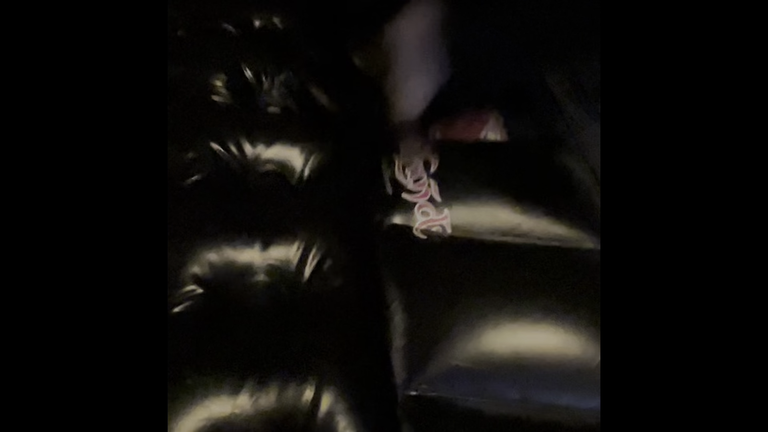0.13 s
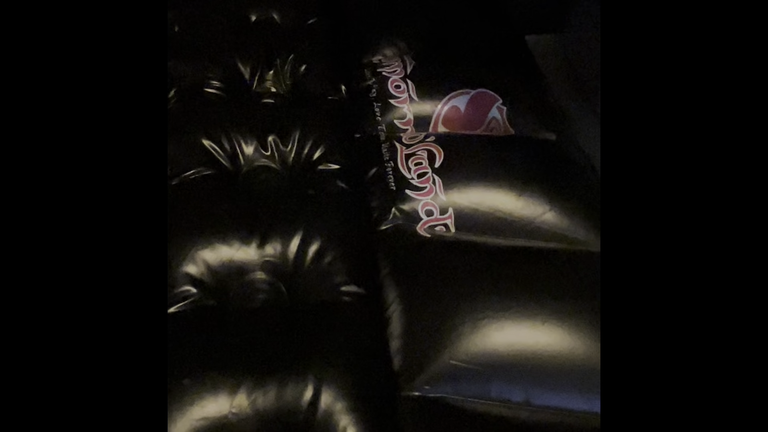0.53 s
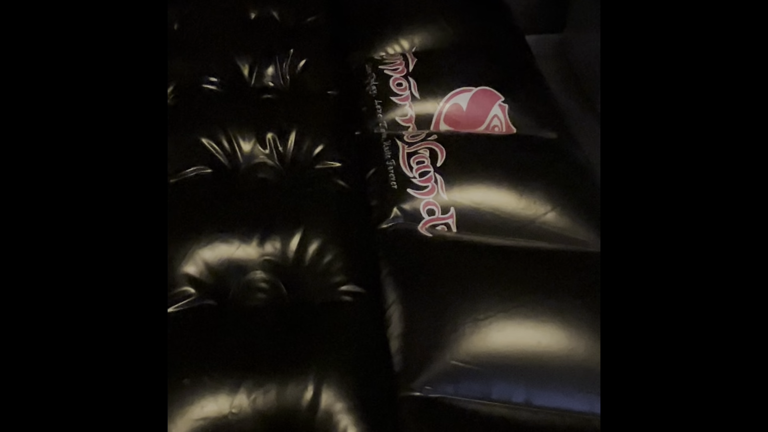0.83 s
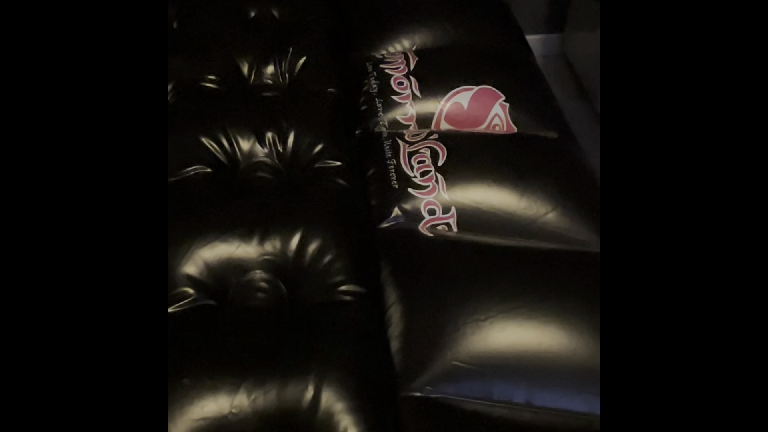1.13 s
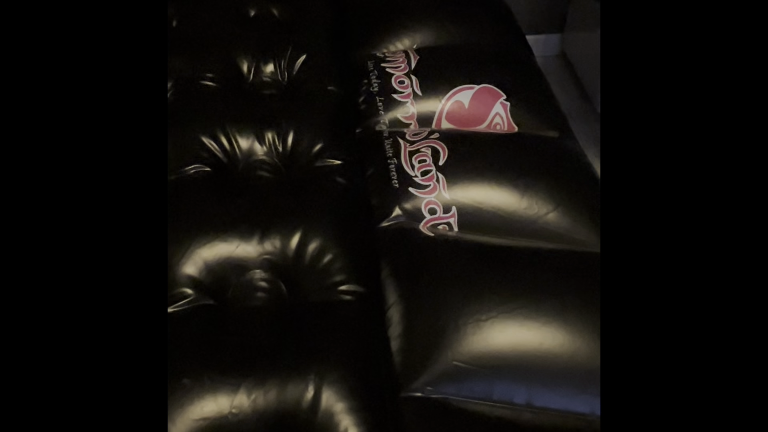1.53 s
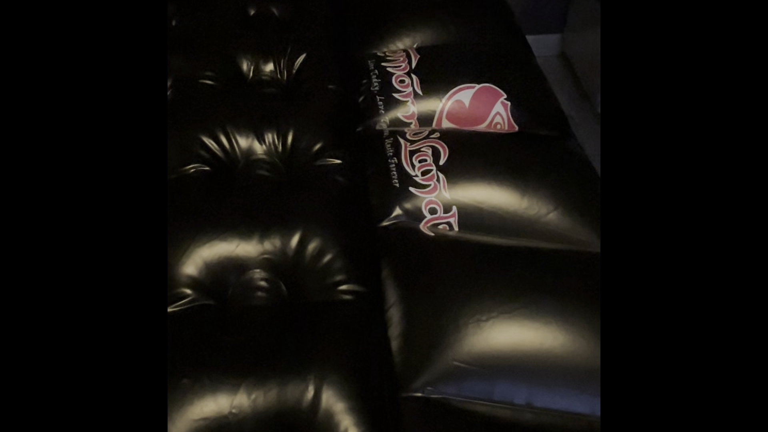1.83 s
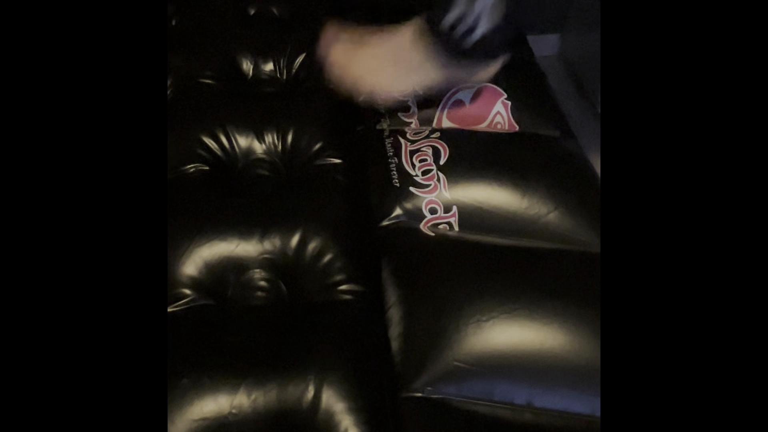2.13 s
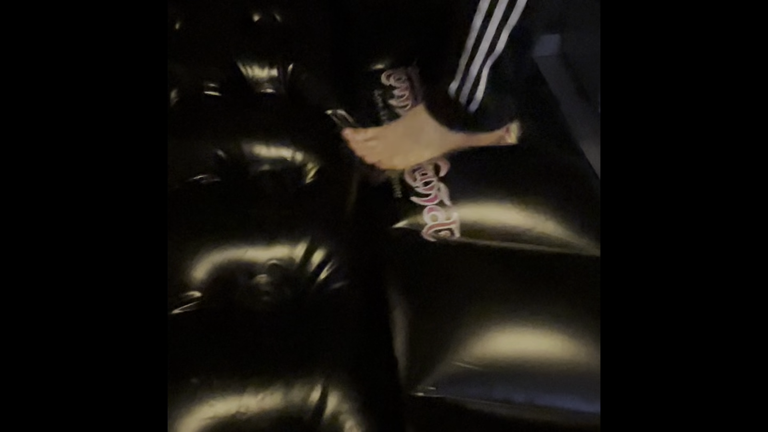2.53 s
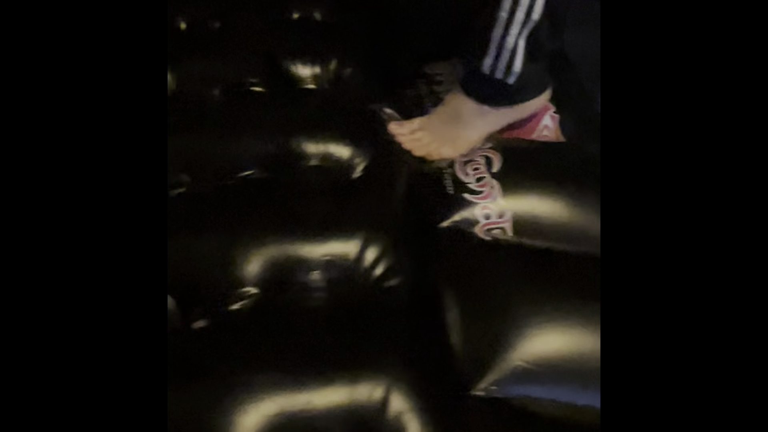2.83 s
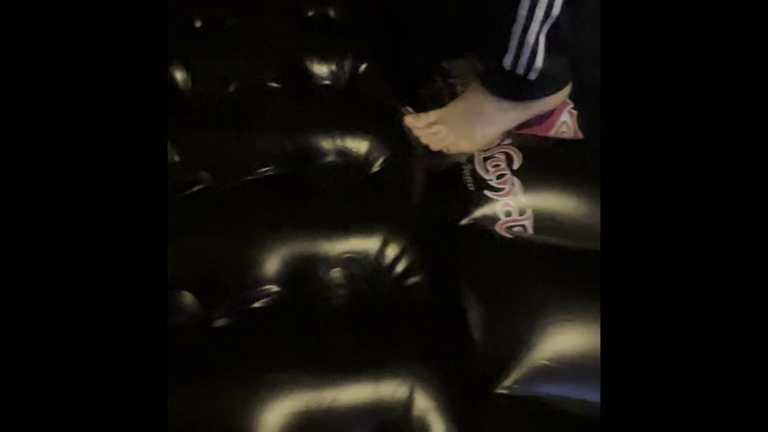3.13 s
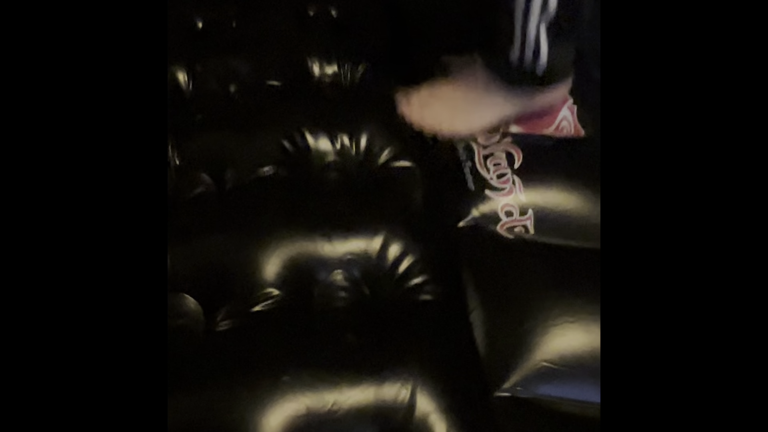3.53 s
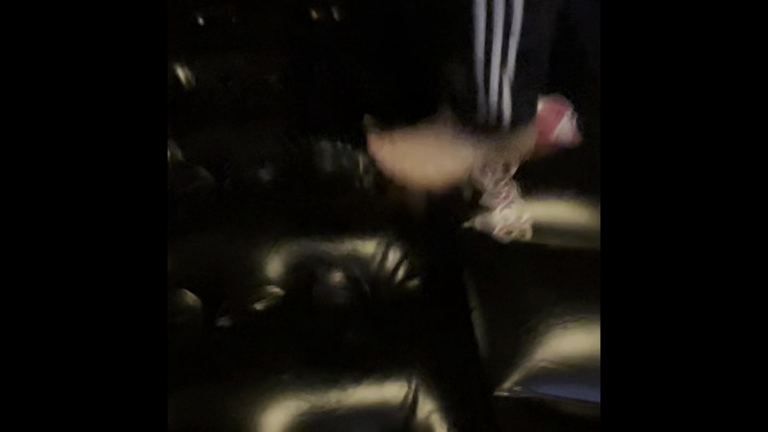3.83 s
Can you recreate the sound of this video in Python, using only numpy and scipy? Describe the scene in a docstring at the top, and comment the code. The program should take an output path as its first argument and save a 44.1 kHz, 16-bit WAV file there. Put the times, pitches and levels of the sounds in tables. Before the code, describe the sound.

An air-filled vinyl mattress booms loudly with rubbing and hollow pops as a bare foot leaves, falls nearly quiet with small ticks, then thumps and rustles under a softer step; small quiet room, close stereo microphone.

```python
"""Bare foot on an air mattress

A bare foot steps off, then on and off again, an air-filled vinyl mattress in a small quiet room.
The air chambers boom under the shifting weight: random slips ring them, over a wandering low tone.
Skin and cloth rub over the vinyl as dense clicks; creases pop as falling tones and tick as short rings.
A close pair of microphone ports gives a narrow bass and a wide treble."""
import sys
import numpy as np
from scipy import signal
from scipy.fft import rfft, irfft
from scipy.io import wavfile

SR = 44100
rng = np.random.default_rng(int(sys.argv[2]) if len(sys.argv) > 2 else 0)


def log_audio(samples):
    """Write samples as a 16-bit WAV file to the path given in sys.argv[1]."""
    # one column per channel
    frames = np.atleast_2d(samples).T
    # limit to full scale, then quantise
    limited = np.clip(frames, -1, 1)
    pcm = np.round(limited * 32767).astype(np.int16)
    wavfile.write(sys.argv[1], SR, pcm)


N = 176400  # length in samples, 4 s


def amp(db):
    """Turn dB into a gain."""
    return 10 ** (np.asarray(db) / 20)


def unit(x):
    """Scale x to an rms level of 1."""
    return x / np.sqrt(np.mean(x ** 2) + 1e-20)


def in_time(spells):
    """Join the spells of a table and draw each column as a curve over time."""
    seconds, *columns = np.concatenate(spells).T
    return [np.interp(np.arange(N) / SR, seconds, column) for column in columns]


def at_hz(points):
    """Draw each column of a table over frequency, on the FFT grid."""
    hz, *columns = np.transpose(points)
    grid = np.log(np.arange(N // 2 + 1) * SR / N + 1)  # the 1 avoids the log of zero
    return [np.interp(grid, np.log(hz), column) for column in columns]


def colour(x, points):
    """Weight the spectrum of x by a table of pitches and levels."""
    return irfft(rfft(x) * amp(at_hz(points)[0]), N)


def cut(x, hz, kind, order=4):
    """Butterworth filter: keep the low, high or band part of x."""
    return signal.sosfilt(signal.butter(order, hz, kind, fs=SR, output="sos"), x)


def drift(rate):
    """Random wander around zero, with a new target `rate` times a second and a spread of about 1."""
    knots = rng.standard_normal(400)
    return np.interp(np.arange(N) / SR * rate, np.arange(400), knots) * 1.2


def grains(rate, spread_db):
    """Two unrelated trains of random clicks, uneven in size and sign, `rate` per second."""
    loudness_db = spread_db * np.minimum(rng.exponential(1, (2, N)), 5)
    size = amp(loudness_db) * rng.choice([-1, 1], (2, N))
    return size * (rng.random((2, N)) < rate / SR)


def ring(x, hz, t60):
    """One resonance driven by x; its ringing falls 60 dB in t60 seconds."""
    radius, angle = amp(-60 / (t60 * SR)), 2 * np.pi * hz / SR
    feedback = [1, -2 * radius * np.cos(angle), radius * radius]
    return signal.lfilter([0, np.sin(angle)], feedback, x + 1e-18)


def add(out, seconds, burst):
    """Mix a burst into out at the given time."""
    i = int(seconds * SR)
    out[i:i + len(burst)] += burst[:N - i]


# Colour of the quiet room. Each row: pitch in Hz, relative level in dB.
ROOM_TONE_COLOUR = [(25, -10), (60, -4.5), (110, -9), (180, 0), (250, -0.5), (400, -9), (480, -7.5),
                    (680, -18.5), (1900, -24.5), (3000, -41), (7400, -43), (16000, -41)]
ROOM_TONE_DB = -57


def room_tone():
    """Steady coloured noise: the room at rest."""
    return amp(ROOM_TONE_DB) * unit(colour(rng.standard_normal((2, N)), ROOM_TONE_COLOUR))


ROOM_T60_S, ROOM_DB, WALL_CUT_HZ = 0.46, -13.5, 3900


def room(x):
    """Echo of x off the walls: two dull noise tails that die away."""
    t = np.arange(SR // 2) / SR
    tail = cut(rng.standard_normal((2, len(t))), WALL_CUT_HZ, "low", order=1)
    tail = tail * amp(-60 * t / ROOM_T60_S) * (t > .004)  # silent for the first 4 ms
    tail = tail / np.sqrt(np.sum(tail ** 2, axis=1, keepdims=True))
    return amp(ROOM_DB) * signal.fftconvolve(x[None], tail, axes=1)[:, :N]


# Rubbing on the vinyl, in spells. Each row: time in seconds, level of the dull scrape in dB,
# level of the bright scrape in dB, level of the fine hiss in dB.
RUB_LEVELS = [
    [(0.0, -45.5, -44.5, -47), (0.094, -44, -45, -47), (0.106, -50, -50.5, -44), (0.158, -59, -44, -48),
     (0.166, -42, -44.5, -42), (0.224, -44, -50.5, -49.5), (0.258, -29, -49, -55.5),
     (0.286, -36, -56, -58.5), (0.544, -65.5, -69.5, -81), (0.632, -64, -68, -71), (0.65, -79, -70, -71),
     (0.708, -67, -66.5, -72), (0.8, -76, -68.5, -68)],
    [(0.83, -62, -64, -54.5), (1.008, -66, -63, -61), (1.184, -70, -78, -77), (1.24, -67, -73.5, -79),
     (1.364, -63, -65, -61.5), (1.744, -71, -79.5, -79), (1.876, -79, -79, -72.5), (1.89, -63, -71, -72),
     (1.988, -69, -73.5, -74.5), (2.032, -68, -70, -69), (2.082, -67, -76, -63), (2.164, -65, -71, -78),
     (2.172, -72, -67, -68)],
    [(2.179, -47, -52, -61), (2.183, -34.5, -51, -44), (2.201, -47, -50, -45), (2.223, -45, -45, -47),
     (2.417, -59, -63, -67), (2.527, -54, -64.5, -68), (2.581, -58, -63.5, -60), (2.703, -45.5, -44.5, -51),
     (2.765, -49.5, -43, -48.5), (2.835, -45.5, -46.5, -50), (2.967, -65, -57, -60.5),
     (2.977, -52, -56, -61), (3.0, -62, -57, -63)],
    [(3.03, -54, -57, -61), (3.114, -46, -48, -53), (3.27, -61, -62.5, -64.5), (3.316, -53.5, -63, -67.5),
     (3.372, -69, -68, -78), (3.386, -58, -70, -87), (3.412, -60, -66, -68), (3.488, -53, -60.5, -62.5),
     (3.518, -51, -55.5, -52), (3.548, -56, -62.5, -58), (3.672, -74, -67.5, -73), (3.754, -61, -64, -75),
     (3.76, -54, -57, -75)],
    [(3.767, -46.5, -52, -51.5), (3.799, -59, -47, -44), (3.809, -47, -51, -51), (3.837, -44, -50, -49.5),
     (3.847, -49, -49, -53.5), (3.885, -50, -51, -52.5), (3.923, -62, -55.5, -55), (4.0, -57, -63, -63)],
]
# Colour of the scrape. Each row: pitch in Hz, relative level in dB.
SCRAPE_COLOUR = [(290, -25), (500, 9), (696, 4), (926, -1), (1050, -1), (1450, -10), (2740, -11),
                 (4500, -23), (5850, -26), (9900, -120)]
# Colour of the fine hiss. Each row: pitch in Hz, relative level in dB.
HISS_COLOUR = [(2000, -51), (3100, -5), (4000, -5), (5000, -4), (6500, -3.5), (7900, -5), (9500, -10),
               (11500, -14.5), (16000, -8.5)]
GRAINS_PER_S, GRAIN_SPREAD_DB, SCRAPE_SPLIT_HZ = 6000, 2, 1430


def rubbing():
    """Dense friction clicks: a scrape in a dull and a bright half, and a finer hiss."""
    dull_db, bright_db, hiss_db = in_time(RUB_LEVELS)
    scrape = colour(grains(GRAINS_PER_S, GRAIN_SPREAD_DB), SCRAPE_COLOUR)
    dull = unit(cut(scrape, SCRAPE_SPLIT_HZ, "low"))
    bright = unit(cut(scrape, SCRAPE_SPLIT_HZ, "high"))
    hiss = unit(colour(grains(3 * GRAINS_PER_S, GRAIN_SPREAD_DB), HISS_COLOUR))
    return amp(dull_db) * dull + amp(bright_db) * bright + amp(hiss_db) * hiss


# Resonances of the air chambers, the two lowest first.
# Each row: pitch in Hz, strength in dB, time to ring down 60 dB in seconds.
CHAMBER_MODES = [(114.5, 1, 0.24), (167.2, 0, 0.21), (246.8, -3.5, 0.18), (285, -11, 0.19),
                 (373, -4, 0.077), (408.6, -5, 0.084), (489.2, -4.5, 0.12), (553, -7.5, 0.089),
                 (682, -6.5, 0.03), (860, -19, 0.16)]


def chambers(x, modes):
    """Air chambers ringing when driven by x: resonances summed with alternating signs."""
    return sum((-1) ** k * amp(db) * ring(x, hz, t60) for k, (hz, db, t60) in enumerate(modes))


# Creases popping into the chambers. Each row: start in seconds, level in dB before the
# soft attack and the fall, end pitch in Hz, start pitch as a multiple of the end pitch.
CREASE_POPS = [(0.1671, -17, 291, 3.0), (.2414, -10, 270, 4.5), (.2586, -6.5, 340, 3.8),
               (1.8936, -30, 320, 4.5), (.7005, -35, 490, 1.5), (1.3702, -32.5, 340, 3.0),
               (1.515, -46.5, 390, 2.1), (2.1799, -28, 305, 2.1), (2.456, -48, 386, 2.1),
               (3.054, -44, 353, 2.1), (3.307, -48.5, 400, 1.5), (3.423, -44, 342, 1.5),
               (3.516, -34.5, 254, 2.1), (3.8318, -16.5, 255, 4.0)]
# POP_FALL_S times the fall in pitch, POP_T60_S the fall in level by 60 dB
POP_ATTACK_S, POP_FALL_S, POP_T60_S = .0018, .0013, .03
POP_BODY_GAIN = 0.00792447  # how much the pops drive the chambers


def pops():
    """Each pop is a tone that falls quickly in pitch and also rings the chambers."""
    out, t = np.zeros(N), np.arange(SR // 6) / SR
    for seconds, db, hz, rise in CREASE_POPS:
        extra_s = (rise - 1) * POP_FALL_S * (1 - np.exp(-t / POP_FALL_S))
        tone = np.sin(2 * np.pi * hz * (t + extra_s))
        attack = 1 - np.exp(-t / POP_ATTACK_S)
        add(out, seconds, -amp(db - 60 * t / POP_T60_S) * attack * tone)
    return out + POP_BODY_GAIN * chambers(out, CHAMBER_MODES)


# Sticky vinyl letting go. Each row: start in seconds, starting level in dB, pitch in Hz,
# time to fall 60 dB in seconds, level of the bright edge's noise against the ring in dB.
VINYL_TICKS = [(0.106, -28.5, 2540, 0.012, -5), (0.114, -34.5, 2870, 0.048, -18),
               (0.1661, -28, 2500, 0.01, -18), (.176, -36, 3230, .015, -19), (.187, -38, 2140, .015, -12),
               (0.2408, -28, 1530, 0.013, -29), (0.2598, -33, 1860, .02, -25),
               (0.6997, -46.5, 2480, 0.026, -25), (0.823, -54, 8200, 0.035, -14),
               (1.012, -49.5, 2350, 0.021, -25), (1.894, -54, 2070, 0.014, -25),
               (2.0208, -58, 3600, 0.093, 3), (2.073, -62, 10500, 0.26, -11.5),
               (2.1764, -40.5, 1160, 0.013, 3.5), (2.1823, -34, 2820, 0.085, 7.5),
               (2.386, -53, 1460, .02, -12), (2.4555, -46.5, 1590, 0.023, -24),
               (2.98, -50, 1510, 0.018, -15), (3.316, -57, 1490, 0.015, 0), (3.3993, -59, 2190, 0.027, 1),
               (3.505, -47, 2920, 0.08, 7), (3.7651, -44, 3000, 0.32, 9.5), (3.88, -45, 2960, 0.028, -15)]
TICK_WIDTH, EDGE_T60_S = 0.13, 0.0095  # TICK_WIDTH: bandwidth as a share of the pitch


def ticks():
    """Each tick is noise through a short rough resonance, with a brief bright edge."""
    out, t = np.zeros(N), np.arange(SR // 6) / SR
    warm_up = 400  # samples for the filters to settle, then dropped
    noise = rng.standard_normal((len(VINYL_TICKS), len(t) + warm_up))
    for (seconds, db, hz, t60, edge_db), puff in zip(VINYL_TICKS, noise):
        rough_t60 = np.log(1000) / (np.pi * TICK_WIDTH * hz)
        tone = unit(ring(puff, hz, rough_t60))[warm_up:]
        edge = cut(puff, 3400, "high", order=2)[warm_up:]
        add(out, seconds, tone * amp(db - 60 * t / t60))
        add(out, seconds, edge * amp(db + edge_db - 60 * t / EDGE_T60_S))
    return out


# Weight shifting on the chambers, in spells. Each row: time in seconds, level of the drumming
# skin in dB, level of the low chambers in dB, level of the deep boom in dB.
LOAD_LEVELS = [
    [(0.0, -38, -32, -39), (0.022, -33.5, -49, -36), (0.042, -29.5, -33, -33), (0.068, -28.5, -32, -29.5),
     (0.094, -32, -31, -27), (0.114, -36, -26.5, -30), (0.134, -40, -30, -36), (0.15, -47, -43, -31),
     (0.172, -28.5, -34, -38), (0.208, -31.5, -36.5, -37), (0.225, -36.5, -34, -37)],
    [(0.295, -35.5, -30.5, -33), (0.555, -64.5, -60.5, -54.5), (0.693, -60, -66, -56),
     (0.699, -50.5, -65, -56), (0.775, -59, -53, -55), (0.839, -54, -73, -56), (0.859, -57, -53, -51),
     (0.923, -56, -73, -66), (0.949, -56, -58, -82), (0.985, -56, -82, -67), (1.085, -61.5, -62, -53),
     (1.223, -64.5, -52, -71), (1.237, -61, -75, -77), (1.3, -71, -71, -56)],
    [(1.33, -75, -50, -60), (1.378, -45, -49.5, -54), (1.454, -60, -61, -58), (1.472, -70, -54, -79),
     (1.514, -58, -73, -80), (1.532, -49.5, -69, -60), (1.566, -61, -70, -50), (1.614, -66, -60, -58),
     (1.646, -61, -56, -89), (1.724, -63, -54, -62), (1.762, -67, -70, -80), (1.778, -67, -60, -66),
     (1.854, -73, -65, -80), (1.885, -55, -53, -82)],
    [(1.905, -51.5, -55, -60), (1.919, -55, -61, -60), (1.933, -53, -51, -60), (1.961, -58, -60, -80),
     (1.971, -77, -61, -80), (1.993, -59, -54, -66), (2.005, -71, -57, -77), (2.013, -61, -56, -80),
     (2.039, -66, -67.5, -80), (2.065, -61, -47, -63), (2.089, -53, -54, -56), (2.123, -59, -52, -55),
     (2.155, -57, -71, -54), (2.172, -60, -57, -55)],
    [(2.185, -43, -33.5, -50), (2.209, -33.5, -42, -35), (2.241, -39, -34, -40), (2.271, -39.5, -43, -38),
     (2.429, -48.5, -47.5, -44), (2.481, -46.5, -46.5, -62), (2.563, -49.5, -44.5, -43.5),
     (2.627, -48.5, -52, -69), (2.657, -40.5, -46.5, -50), (2.861, -43, -43.5, -56), (2.899, -50, -50, -79),
     (2.945, -52, -53, -40), (3.081, -40.5, -49, -64), (3.1, -42, -55, -56)],
    [(3.14, -46, -51, -60), (3.226, -53.5, -52, -39.5), (3.336, -45, -54, -56), (3.364, -51.5, -51, -60),
     (3.392, -58, -52, -59), (3.434, -46, -51, -47), (3.476, -45, -39.5, -62), (3.53, -45, -38.5, -46.5),
     (3.654, -58, -56, -56), (3.724, -56, -54, -58), (3.8, -36.5, -37.5, -41.5), (3.898, -35, -34.5, -37),
     (3.966, -43.5, -39, -33.5), (4.0, -47, -61, -37)],
]
# Broad colour of the drumming skin. Each row: pitch in Hz, relative level in dB.
SKIN_COLOUR = [(150, -42), (200, -20), (324, -0.5), (460, -4), (600, -12.5), (800, -18), (1200, -27.5),
               (2000, -81)]
# Broad colour around the low chambers. Each row: pitch in Hz, relative level in dB.
LOW_SKIN_COLOUR = [(60, -25), (85, -13.5), (120, 9), (170, 7.5), (210, -5.5), (280, -35)]
SLIPS_PER_S, SLIP_SPREAD_DB, SLIP_SOFT_HZ = 400, 2.5, 500
BROAD_DB, SKIN_TOP_HZ = 0.5, 1124  # BROAD_DB: broad colour against the ringing
BOOM_HZ, BOOM_WANDER_HZ, BOOM_NOISE = 62.2, 6.86, 0.53  # BOOM_NOISE: rms of the added noise


def mattress():
    """Slips under load ring the chambers and shake the skin; the whole air volume booms."""
    skin_db, low_db, boom_db = in_time(LOAD_LEVELS)
    slips = grains(SLIPS_PER_S, SLIP_SPREAD_DB)
    soft = cut(slips, SLIP_SOFT_HZ, "low", order=1)
    skin = unit(chambers(soft, CHAMBER_MODES[2:]))
    skin = skin + amp(BROAD_DB) * unit(colour(slips, SKIN_COLOUR))
    skin = unit(cut(skin, SKIN_TOP_HZ, "low"))
    low = unit(chambers(soft, CHAMBER_MODES[:2]))
    low = low + amp(BROAD_DB) * unit(colour(slips, LOW_SKIN_COLOUR))
    low = unit(cut(low, SKIN_TOP_HZ / 2, "low"))
    boom_hz = BOOM_HZ + BOOM_WANDER_HZ * drift(7.1)
    boom = np.sin(2 * np.pi * np.cumsum(boom_hz) / SR)
    rumble = unit(cut(rng.standard_normal((2, N)), [35, 90], "band", order=2))
    boom = unit(boom + BOOM_NOISE * rumble)
    return amp(skin_db) * skin + amp(low_db) * low + amp(boom_db) * boom


# Side (left-right difference) against the middle at the two ports. Each row: pitch in Hz,
# level in dB, share that follows the middle from 0 to 1, phase of that share in radians.
SIDE_SHARE_TABLE = [(40, -47, 0.8, -10), (90, -24.5, 0.2, -5), (180, -19, 0.86, -1.5),
                    (350, -17.5, 0.44, -3), (696, -2.5, 0.5, -1.63), (1230, -2.5, 0.47, -1.6),
                    (1900, -16, 0, -3), (2650, 0.5, 0.2, -1), (3540, 2, 0.4, -1.85),
                    (5200, -1.5, 0.4, -1.4), (6900, -18, .5, -1.8), (8300, -5.5, 0.7, -1.54),
                    (11000, 3.5, 1, -1.6), (16000, -3.5, 0.7, -1.6)]


def scene():
    """Middle from one draw of all sources; the side blends a phase-turned middle with a second draw."""
    hits = pops() + ticks()
    mid, other = room_tone() + room(hits) + rubbing() + mattress()
    mid = mid + hits  # the direct hits are in the middle draw only
    db, tied, phase = at_hz(SIDE_SHARE_TABLE)
    tied = np.clip(tied, 0, 1)
    following = tied * np.exp(1j * phase) * rfft(mid)
    separate = np.sqrt(1 - tied ** 2) * rfft(other)
    side = irfft(amp(db) * (following + separate), N)
    side = side * np.clip(np.arange(N)[::-1] / 200, 0, 1)  # fade out the last 200 samples
    return np.array([mid + side, mid - side])


MIDDLE_CUT_HZ, BASS_CUT_HZ, CUTOFF_HZ = 12550, 27, 16000


def record(dry):
    """Filters thin the deepest bass and cut the top; the middle's treble ends lower than the side's."""
    mid, side = (dry[0] + dry[1]) / 2, (dry[0] - dry[1]) / 2
    mid, side = cut([mid, side], BASS_CUT_HZ, "high", order=3)
    middle_cut = signal.cheby2(8, 17, MIDDLE_CUT_HZ, fs=SR, output="sos")
    mid = signal.sosfiltfilt(middle_cut, mid)  # run forwards and backwards
    top_cut = signal.cheby2(20, 60, CUTOFF_HZ, fs=SR, output="sos")
    return signal.sosfilt(top_cut, [mid + side, mid - side])


dry = scene()
out = record(dry)
log_audio(out)
```